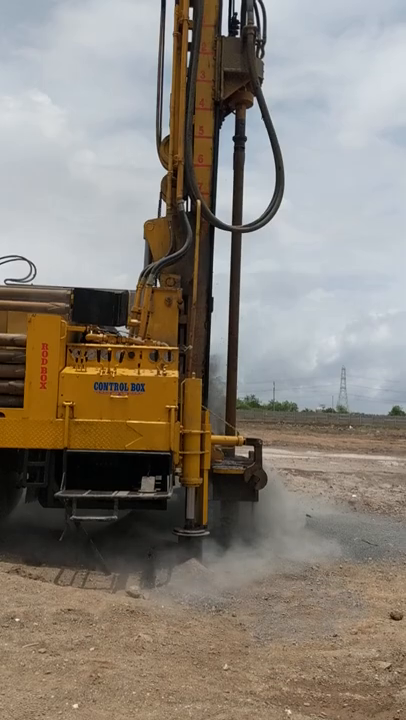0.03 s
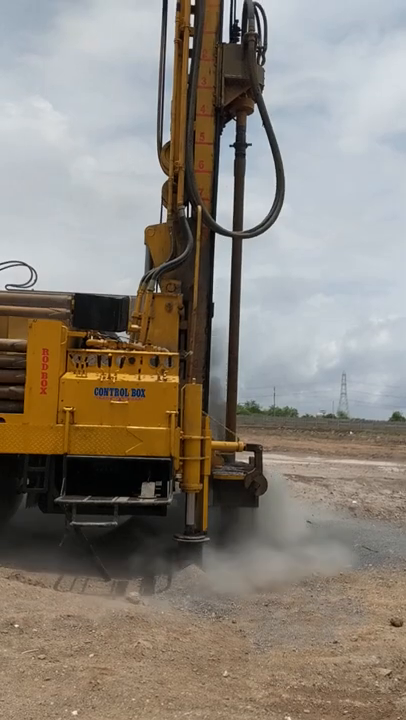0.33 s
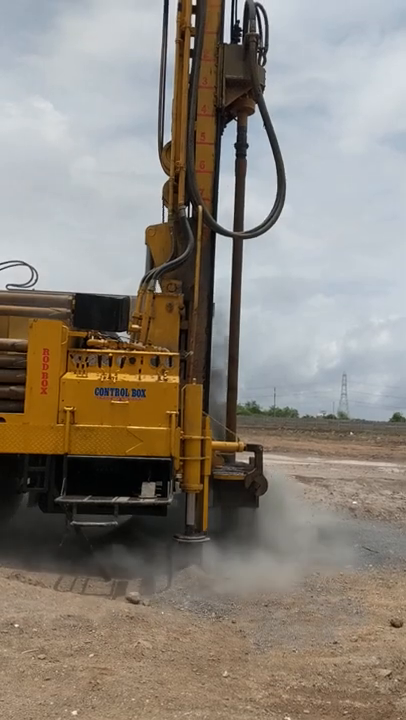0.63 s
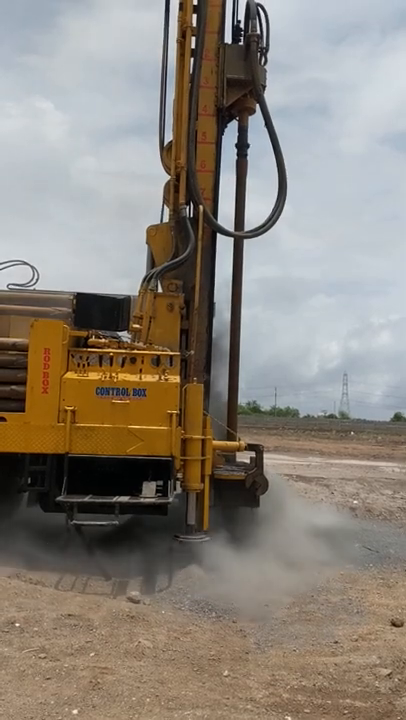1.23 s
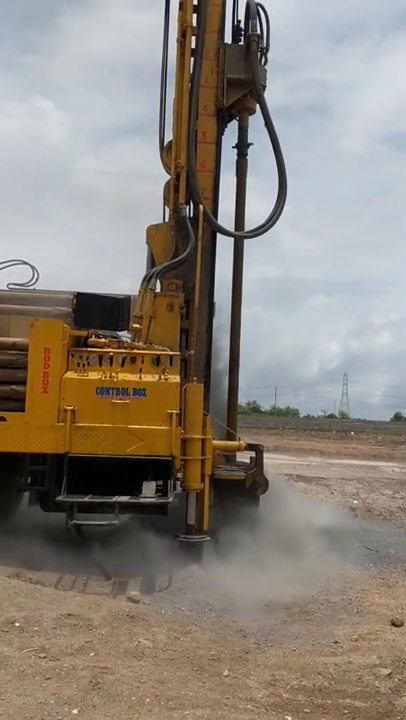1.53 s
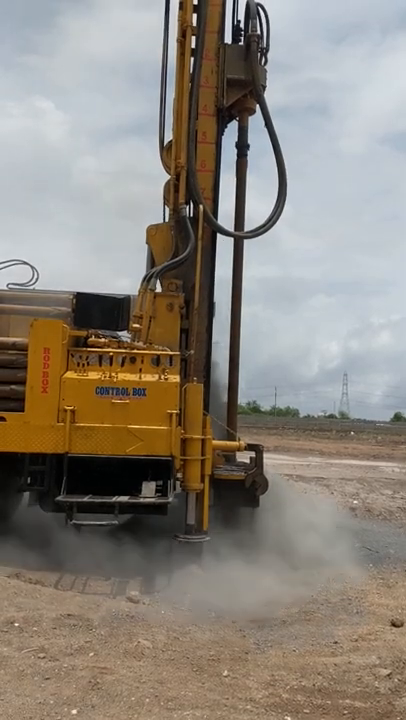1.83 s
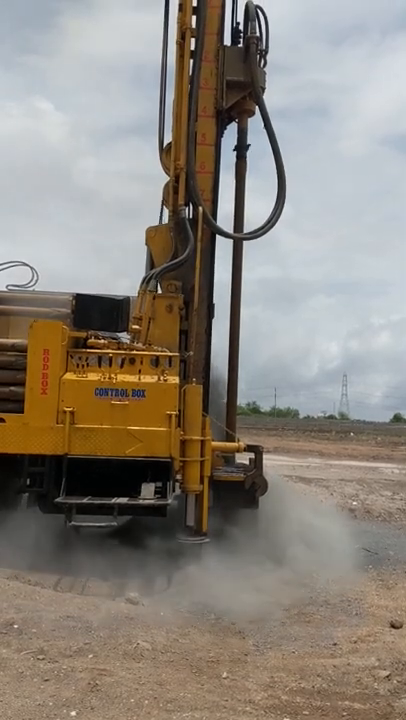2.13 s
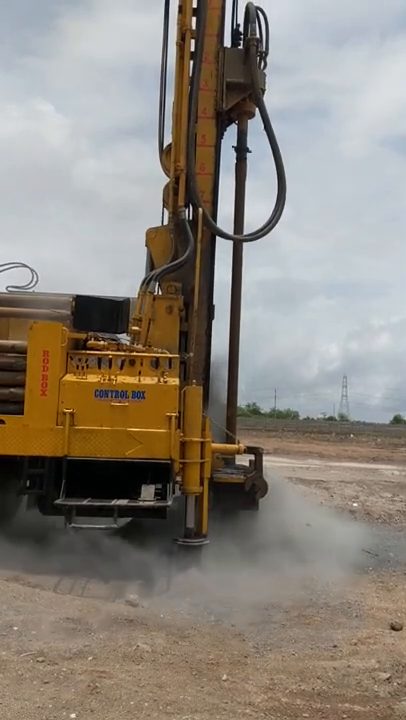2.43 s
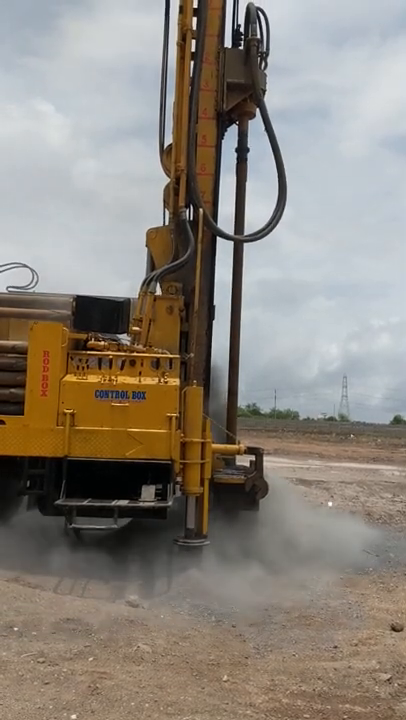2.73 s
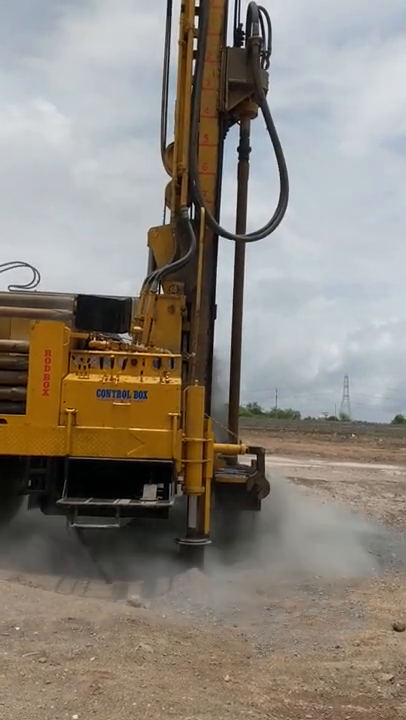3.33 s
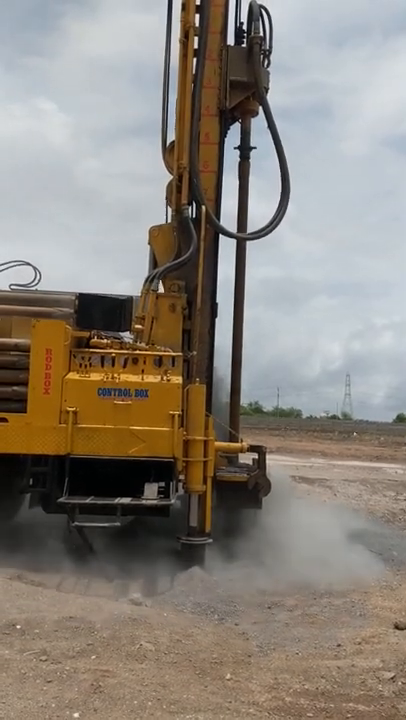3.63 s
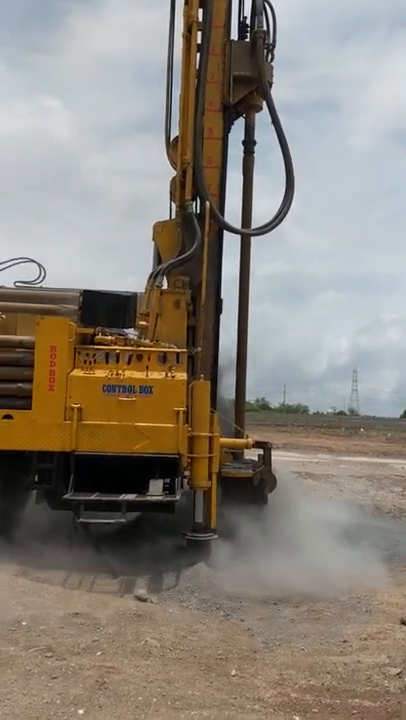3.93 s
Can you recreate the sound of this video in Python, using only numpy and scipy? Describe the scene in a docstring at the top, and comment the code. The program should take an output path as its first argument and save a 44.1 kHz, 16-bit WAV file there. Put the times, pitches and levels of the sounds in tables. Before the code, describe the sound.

Rapid, continuous metallic hammering comes from a drilling rig working in the open. Sharp cracks and ringing steel ride over a steady engine rumble and a fluttering hiss of air, with occasional short squeaks from the pipe.

```python
"""A truck-mounted rig drills dry ground. The sound opens abruptly, the deep bass a moment later:
diesel engine and compressor drone, and flushing air hisses out of the hole. Over them an air hammer
strikes the steel drill pipe about 25 times a second. Each blow arrives first as a sharp crack and
clash, then as a bending wave that dispersion draws into a falling chirp. Pipe, fittings and mast
ring on into the next blow, and now and then one pipe mode sings out."""
import sys
import numpy as np
from scipy import signal
from scipy.fft import rfft, irfft
from scipy.io import wavfile

SR = 44100
rng = np.random.default_rng(int(sys.argv[2]) if len(sys.argv) > 2 else 0)


def transcribe(signal):
    """Save signal, clipped to [-1, 1], as a 16-bit WAV file at the path in sys.argv[1]."""
    frames = np.atleast_2d(signal).T
    limited = np.clip(frames, -1, 1)
    pcm = np.round(limited * 32767).astype(np.int16)
    wavfile.write(sys.argv[1], SR, pcm)


N = 176400
T, HZ = np.arange(N) / SR, np.fft.rfftfreq(N, 1 / SR)


def amp(db):
    """Decibels to amplitude ratio."""
    return 10 ** (np.asarray(db) / 20)


def unit(x):
    """Normalisation to rms 1."""
    return x / np.sqrt(np.mean(x ** 2) + 1e-20)


def curve(points, t):
    """Linear interpolation of a table over time."""
    return np.interp(t, *np.transpose(points))


def response(points):
    """Gain at every frequency, interpolated in decibels over log frequency."""
    hz, db = np.transpose(points)
    return amp(np.interp(np.log(HZ + 1), np.log(hz + 1), db))


def filtered(x, gain):
    """Linear filtering as a product of spectra; rms 1."""
    return unit(irfft(rfft(x) * gain, N))


def wander(hz):
    """Random modulation: noise low-passed at hz; rms 1."""
    return filtered(rng.standard_normal(N), 1 / (1 + (HZ / hz) ** 4))


def envelope(times, strengths, rise_s, decay_s):
    """Superposition of one exponential rise and decay per blow."""
    t, total = np.arange(4000) / SR, np.zeros(N + 8000)
    pulse = (1 - np.exp(-t / rise_s)) * np.exp(-t / decay_s)
    for start_s, strength in zip(times, strengths):
        span = total[max(round(start_s * SR), 0):][:len(t)]
        span += strength * pulse[:len(span)]
    return total[:N]


def bursts(times, strengths, rise_s, decay_s, grain_db=0):
    """Random micro-impacts add up to a decaying noise burst at each blow."""
    noise = envelope(times, strengths, rise_s, decay_s) * rng.standard_normal(N)
    return noise * amp(grain_db * wander(hz=463))


def resonator(drive, hz, t60_s):
    """Resonance: a damped mode takes up only the force near its pitch; rms 1."""
    pole = np.exp((2j * np.pi * hz - np.log(1000) / t60_s) / SR)
    ringing = signal.lfilter([1], [1, -pole], drive).real
    return filtered(ringing, 1 / (1 + ((HZ - hz) / 260) ** 2))


# Spectrum of combustion noise: frequency_hz, density_db
RUMBLE_SPECTRUM = [(15, -30), (30, -16), (45, 1), (65, 7.5), (100, -4), (150, -5), (280, -0.5), (380, -2.5),
                   (480, -14), (1000, -11.5), (3000, -65)]
def rumble():
    """Combustion radiates broadband noise, strongest in the bass."""
    return amp(-39) * filtered(rng.standard_normal(N), response(RUMBLE_SPECTRUM))


# Engine tones: multiple_of_firing_rate, level_db
ENGINE_ORDERS = [(1, -29.5), (2, -41.5), (4, -56), (5, -53)]
# Compressor tones: multiple_of_compressor_rate, level_db
COMPRESSOR_ORDERS = [(1.001, -46), (1.652, -46), (2, -49), (2.5, -51)]
def machine(orders, rate_hz, sway, flutter_db):
    """A governed shaft radiates orders, tones locked to its slightly wavering speed."""
    cycles = np.cumsum(rate_hz * (1 + sway * wander(hz=4.7))) / SR
    out = np.zeros(N)
    for order, db in orders:
        peak = np.sqrt(2) * amp(db + flutter_db * wander(hz=14))
        out += peak * np.sin(2 * np.pi * (order * cycles + rng.random()))
    return out


# Spectrum that the steel radiates: frequency_hz, density_db
STEEL_SPECTRUM = [(88, -20), (150, -1), (178, -0.5), (200, -9), (278, -6), (450, -15.5), (690, -8),
                  (757, -11), (1200, -13), (1320, -15.5), (1570, -16), (1730, -15.5), (2140, -9.5),
                  (2400, -21), (2650, -21.5), (3400, -19.5), (5000, -16.5), (5300, -15.5), (5720, -12.5),
                  (6810, -20), (8250, -9.5), (9450, -17.5), (10200, -12), (11200, -27.5), (15000, -57)]
# Stop bands and peaks of the pipe's joints: centre_hz, width_hz, gain_db
JOINT_BANDS = [(1030, 110, 0), (1315, 26, -7), (2513, 39, 5.5), (3350, 37, -14), (5300, 97, -10),
               (6660, 31, 8), (7610, 90, -2), (9900, 100, -14), (10300, 60, 2.5)]
def steel_response():
    """A jointed pipe acts as a filter, blocking some bands and favouring others."""
    bands_db = sum(db * np.exp(-((HZ - hz) / width) ** 2) for hz, width, db in JOINT_BANDS)
    return response(STEEL_SPECTRUM) * amp(bands_db)


# Colour of the air, relative to the steel: frequency_hz, gain_db
AIR_COLOUR = [(150, -11), (500, 3.5), (1200, 1), (2100, 7.5), (3000, 8.5), (5500, 2.5), (8500, -13.5),
              (10300, 2.5), (14000, 6)]
def flushing_air():
    """Turbulent air leaves the hole as a fluttering hiss, coloured by the pipe."""
    hiss = filtered(rng.standard_normal(N), steel_response() * response(AIR_COLOUR))
    return amp(-37 + 1.9 * wander(hz=36)) * hiss


FIRST_BLOW_S, BLOW_HZ = 0.0232, 24.732
# How far the hammer falls behind its beat: time_s, lag_s
BEAT_LAG = [(.1, -.0016), (.6, -.001), (.8, 0), (1.2, .0001), (2.0, -.0004), (2.4, -.0014), (2.7, .0006),
            (3.7, .0012), (4, .0023)]
# Force of ordinary blows as the rock gives or resists: time_s, level_db
BLOW_FORCE = [(.1, 5.5), (.55, 1.5), (.7, 1.5), (1.1, 1), (1.7, 2.1), (2.4, 0), (3.0, 1.2), (3.4, 1.5),
              (4, 1.5)]
# Blows that stand out: time_s, strike_db, crack_db, jingle_db
ACCENTS = [(0.1, 3, 8, 7.0), (0.14, 4, 3.5, 0.5), (0.18, 3.5, 8, 9), (0.22, 3, 6.5, 10.5), (0.26, 3, 8, -2),
           (0.3, 3.5, 1, 9), (0.35, 4.5, -5, 3), (0.39, 2.5, -14, -9), (0.47, 2.5, -3, -1.0),
           (0.51, 0.5, -11, -5), (0.59, 2.5, 0.0, -2.5), (0.63, 4, 5, -6), (0.75, -1.5, 2, 13.5),
           (0.79, 3, 5, 10.5), (0.83, 2, 2, -7), (0.87, 0.5, 2.0, 12.5), (0.95, -1.5, 8, 4),
           (0.99, 0, 7.0, 2.0), (1.07, 2.0, -1, 1), (1.2, 2.5, -11, -20), (1.32, 4.5, 0, 0.0),
           (1.4, 2, 1.5, 9.5), (1.44, 4.5, -1, -1), (1.48, 2.5, 9, 8), (1.6, 3.5, -6, -20),
           (1.68, 2.0, 5.5, -17), (1.76, 2.5, -4, -14), (1.84, 3, 2.5, 4), (1.96, 1.5, 2, 13),
           (2.0, 3, -1.5, -3), (2.08, 1.0, 8, 12.5), (2.13, 2.5, 0, 8.5), (2.25, 3, -4.5, 3.5),
           (2.37, 2.5, 5.5, 9), (2.41, 1.5, 6.5, 6), (2.49, 0.5, 3, 7.0), (2.57, 0.5, 6.5, 8),
           (2.61, 3.5, -13, 6), (2.73, 2.5, 6.5, 5.5), (2.89, 3.5, -1.5, 5.5), (3.14, 3.5, -6, -4),
           (3.18, 2.5, -8.5, -2.0), (3.46, 2.5, -4, -3.5), (3.66, 0.5, 10, -1), (3.7, -0.5, 5, 9.5),
           (3.74, 0.0, 6.5, -2), (3.83, -3.0, 11.5, 8), (3.99, 2, 4.5, -2)]
def blows():
    """The piston's nearly periodic impacts: their times and their strike, crack and jingle gains."""
    beats = np.arange(FIRST_BLOW_S, N / SR, 1 / BLOW_HZ)
    scatter = rng.standard_normal((len(beats), 4)) * [0.00015, 0.67, 4.5, 4.5]
    jitter_s, uneven_db, crack_db, jingle_db = scatter.T
    levels_db = np.array([curve(BLOW_FORCE, beats) + uneven_db, crack_db, jingle_db])
    for time_s, *accent_db in ACCENTS:
        levels_db[:, np.argmin(abs(beats - time_s))] = accent_db
    return (beats + curve(BEAT_LAG, beats) + jitter_s, *amp(levels_db))


def bending_phase(hz, delay_at_1khz_s=0.0096):
    """Dispersion: bending waves speed up as the root of frequency, so low notes arrive late."""
    return -4 * np.pi * delay_at_1khz_s * np.sqrt(hz * 1000)


# Thud in the ground and frame: multiple_of_blow_rate, level_db
THUD_HARMONICS = [(2, -40), (3, -49), (4, -39), (5, -41.5), (6, -51.5), (7, -41.5), (8, -51.5), (9, -48.5),
                  (10, -56), (11, -47.5), (12, -53), (16, -58.5), (28, -49.5)]
def thud():
    """A periodic force drives ground and frame at harmonics of its rate."""
    beat_s = T - FIRST_BLOW_S - curve(BEAT_LAG, T)
    out = np.zeros(N)
    for harmonic, db in THUD_HARMONICS:
        hz = harmonic * BLOW_HZ
        peak = np.sqrt(2) * amp(db + 0.83 * wander(hz=3.9))
        out += peak * np.cos(2 * np.pi * hz * beat_s + bending_phase(hz))
    return out


# Colour of the mast, relative to the steel: frequency_hz, gain_db
MAST_COLOUR = [(150, -14.5), (500, 5), (1200, 6.5), (2100, -7.5), (3000, -9), (5500, 1.5), (8500, -3),
               (10300, -30), (14000, 14)]
def mast(times, strike, t60_s=0.26):
    """Modal overlap: the mast's crowded modes merge into a metallic wash between blows."""
    tail = rng.standard_normal(N) * amp(-60 * T / t60_s)
    hits = bursts(times, strike, rise_s=0.0014, decay_s=0.0023)
    return amp(-38) * filtered(hits, rfft(tail) * steel_response() * response(MAST_COLOUR))


# Modes of the loose fittings: pitch_hz, level_db, t60_s, lag_s, unevenness_db
FITTING_MODES = [(689.5, -58, 0.37, 0.0108, -0.5), (1475, -47, 0.021, 0.0052, 0.5),
                 (1597, -48.5, 0.063, 0.0063, 2.5), (2052, -45.5, 0.11, 0.00634, -0.5),
                 (2150, -48, 0.037, 0.0071, -0.5), (5035, -48, 0.22, 0.0073, 5.5),
                 (5660, -53.5, 0.14, 0.0057, 13), (8040, -49, 0.14, 0.0042, 5),
                 (8200, -57, 0.063, 0.001, 11)]
def fittings(times, strike):
    """Loose collars and clamps ring as damped resonators, struck now hard, now lightly."""
    out = np.zeros(N)
    for hz, db, t60_s, lag_s, uneven_db in FITTING_MODES:
        strengths = strike * amp(uneven_db * rng.uniform(-1.2, 1.2, len(times)))
        drive = bursts(times + lag_s, strengths, rise_s=0.00042, decay_s=0.0082)
        out += amp(db) * resonator(drive, hz, t60_s)
    return out


def jingle(times, strengths, pitch_hz=10315, drift_hz=16):
    """Free vibration: a small steel part chinks twice after each blow on one high mode."""
    chinks = envelope(times + 0.00077, strengths, rise_s=0.0014, decay_s=0.015)
    chinks += envelope(times + 0.012, strengths, rise_s=0.0031, decay_s=0.0054)
    cycles = np.cumsum(pitch_hz + drift_hz * wander(hz=19.9)) / SR
    tone = np.sin(2 * np.pi * cycles + 0.14 * wander(hz=250))
    return amp(-42.5) * unit(chinks * tone * amp(2.7 * wander(hz=200)))


# Moments when one pipe mode sings out: peak_s, pitch_hz, level_db, half_width_s
RUBS = [(.23, 5604, -40, 0.054), (.5, 2220, -34, .03), (.53, 5020, -43, 0.061), (.64, 5604, -40.5, 0.056),
        (1.03, 5610, -40, 0.055), (1.222, 5060, -33, 0.024), (1.38, 5069, -41.5, 0.068),
        (1.42, 2740, -42.5, .03), (2.3, 2740, -45.5, 0.056), (2.35, 5140, -38, 0.028),
        (2.56, 2720, -37, 0.034), (2.82, 4980, -42.5, .06), (3.13, 2090, -35.5, 0.044),
        (3.17, 5060, -45, 0.058), (3.26, 2060, -36, 0.037), (3.24, 7251, -42, 0.028),
        (3.4, 3190, -38, 0.041), (3.55, 7280, -40, 0.051), (3.75, 5030, -37, 0.033),
        (3.76, 4860, -42, 0.034), (3.95, 5604, -37.5, .035)]
def pipe_rubbing():
    """Friction excitation: the pipe rubs in its guide and one mode builds up, rough and wavering."""
    out = np.zeros(N)
    for peak_s, hz, db, half_width_s in RUBS:
        tone = np.sin(2 * np.pi * hz * T + 0.75 * wander(hz=45))
        rough_tone = unit(tone * amp(2.6 * wander(hz=110)))
        out += amp(db) * np.exp(-((T - peak_s) / half_width_s) ** 2) * rough_tone
    return out


# Long-ringing modes of the drill pipe: pitch_hz, relative_level_db
PIPE_MODES = [(2110, -48), (2213, -48), (2595, -57), (2740, -52), (3187, -53), (3601, -58), (3941, -53),
              (4678, -59), (4818, -56), (5071, -55), (5453, -57), (5604, -52), (6401, -57), (6804, -58),
              (7251, -55)]
def pipe_ringing(times, strike, swell_hz=2.666, gain_db=3.5):
    """Repeated impacts sustain the pipe's normal modes, which swell and fade as it turns."""
    drive, out = bursts(times, strike, rise_s=0.0012, decay_s=0.019), np.zeros(N)
    lowest_hz = PIPE_MODES[0][0]
    for hz, db in PIPE_MODES:
        cycles = swell_hz * (T - 0.11) - np.log(hz / lowest_hz)  # higher modes swell later
        swell_db = 1.5 * np.cos(2 * np.pi * cycles) + 2 * wander(hz=2.3)
        out += amp(db + gain_db) * resonator(drive * amp(swell_db), hz, t60_s=0.26)
    return out


# Colour of the bending wave, relative to the steel: frequency_hz, gain_db
BENDING_COLOUR = [(150, -9), (300, -18.5), (520, 5), (700, 4), (900, 6.5), (1500, 1), (2100, -11),
                  (3000, 8.5), (4300, 9), (6000, -5.5), (8500, -5.5), (14000, -12)]
def bending_wave(times, strike):
    """Dispersion draws each blow's clean snap and gritty burst out into a falling chirp."""
    samples = np.clip(times * SR, 0, N).astype(int)
    snaps = np.bincount(samples, weights=strike ** 3.3, minlength=N + 1)[:N]
    grit = bursts(times, strike, rise_s=0.0005, decay_s=0.004, grain_db=3)
    hits = amp(-0.5) * unit(snaps) + unit(grit)
    path = steel_response() * response(BENDING_COLOUR) * np.exp(1j * bending_phase(HZ))
    return amp(-39.5) * filtered(hits, path)


# Spectrum of the crack at the front of a blow: frequency_hz, density_db
CRACK_SPECTRUM = [(1000, -40), (4000, -9), (6000, -9), (7000, -21), (7700, -4.5), (8300, 3), (9000, -13),
                  (9600, 0), (10500, -36), (11500, -18.5), (15000, -44)]
def crack(times, strengths, rebound_s=0.00565):
    """Brief contact makes a bright spectrum: steel cracks on steel, then rebounds more weakly."""
    hits = bursts(times + 0.0002, strengths, rise_s=0.0003, decay_s=0.0019)
    hits += amp(-5.5) * bursts(times + rebound_s, strengths, rise_s=0.00044, decay_s=0.0033)
    return amp(-45) * filtered(hits, response(CRACK_SPECTRUM))


# Overlapping bands of the clash: centre_hz
CLASH_BANDS = [600, 1500, 3200, 4600, 6200, 7800, 9000, 11000]
# Colour of the clash, relative to the steel: frequency_hz, gain_db
CLASH_COLOUR = [(150, 5), (400, -3), (700, -5.5), (1500, -2), (3000, 3.5), (4500, -17), (6000, -1.5),
                (8500, -7), (10300, -9), (14000, -1)]
def clash(times, strike, crack_gain):
    """The compression wave travels fastest, reaches the rig first and rattles it twice."""
    spectrum = np.zeros(len(HZ), complex)
    for hz, selector in zip(CLASH_BANDS, np.eye(len(CLASH_BANDS))):
        strengths = crack_gain if hz > 7000 else strike ** 0.51
        hits = bursts(times, strengths, rise_s=0.00047, decay_s=0.02)
        hits += amp(6) * bursts(times + 0.0055, strengths, rise_s=0.0013, decay_s=0.0056)
        band = np.sqrt(np.interp(HZ, CLASH_BANDS, selector))  # equal-power crossover
        spectrum += rfft(hits) * band
    rattle = irfft(spectrum, N) * amp(2.86 * wander(hz=403))
    return amp(-37) * filtered(rattle, steel_response() * response(CLASH_COLOUR))


def scene():
    """Superposition of engine, compressor, air and hammer in the open."""
    times, strike, crack_gain, jingle_gain = blows()
    engine = rumble() + machine(ENGINE_ORDERS, rate_hz=67.63, sway=0.0016, flutter_db=0.5)
    compressor = machine(COMPRESSOR_ORDERS, rate_hz=46.7, sway=0.0055, flutter_db=3)
    background = engine + compressor + flushing_air()
    rig = thud() + mast(times, strike) + fittings(times, strike) + jingle(times, jingle_gain)
    pipe = pipe_rubbing() + pipe_ringing(times, strike)
    impacts = bending_wave(times, strike) + crack(times, crack_gain) + clash(times, strike, crack_gain)
    return (background + rig + pipe + impacts)[None]


# Level of the deep bass: time_s, gain_db
BASS_GAIN = [(.1, -3.5), (.27, -8.5), (.31, .5), (1.2, 0), (4, 1)]
def record(dry, open_s=0.073, rise_s=0.019, bass_hz=105, cutoff_hz=15850):
    """Gating and filtering: an abrupt opening, the deep bass a moment later, then a band limit."""
    bass = irfft(rfft(dry) / (1 + (HZ / bass_hz) ** 6), N)
    balanced = dry + bass * (amp(curve(BASS_GAIN, T)) - 1)
    gate = np.clip((T - open_s) / rise_s, amp(-74), 1)
    lowpass = signal.firwin(511, cutoff_hz, window=("kaiser", 9), fs=SR)
    return signal.oaconvolve(balanced * gate, lowpass[None], "same")


dry = scene()
out = record(dry)
transcribe(out)
```